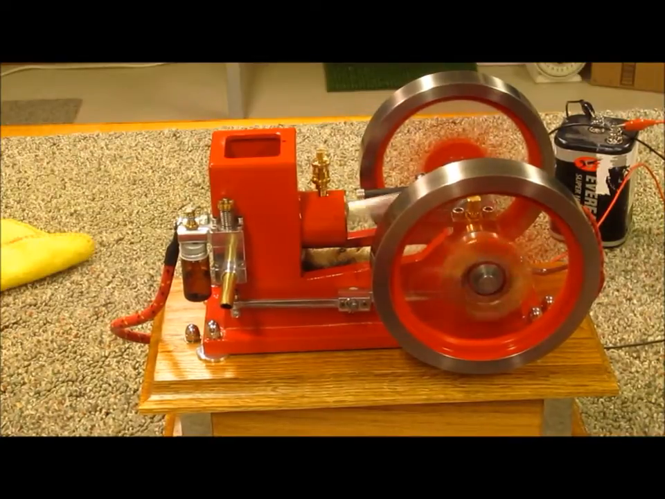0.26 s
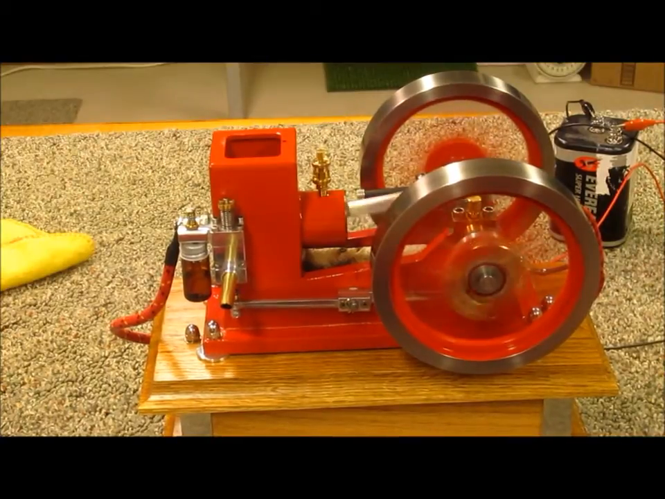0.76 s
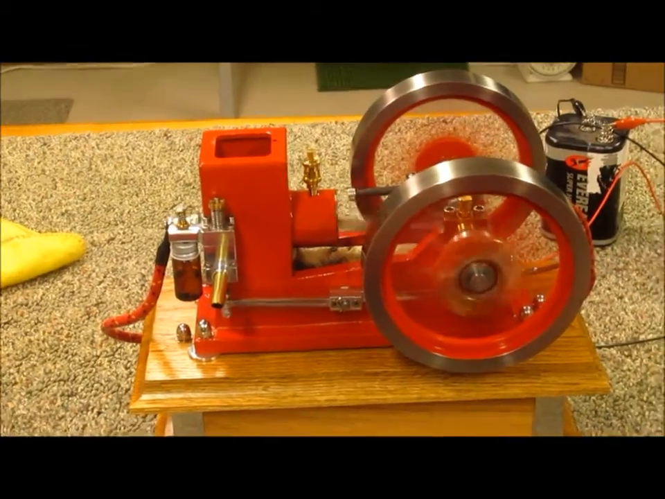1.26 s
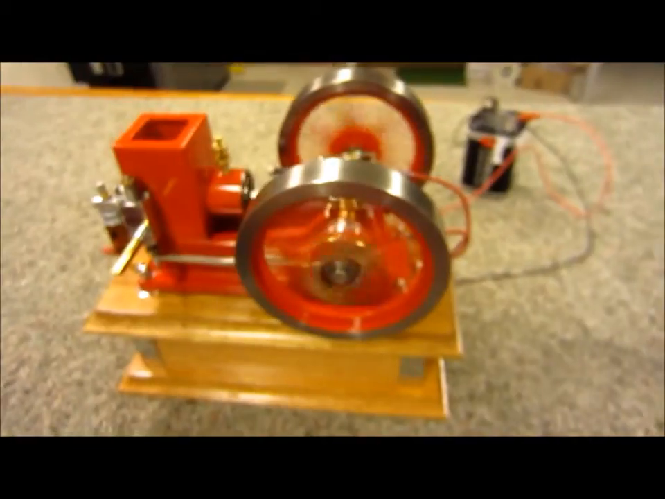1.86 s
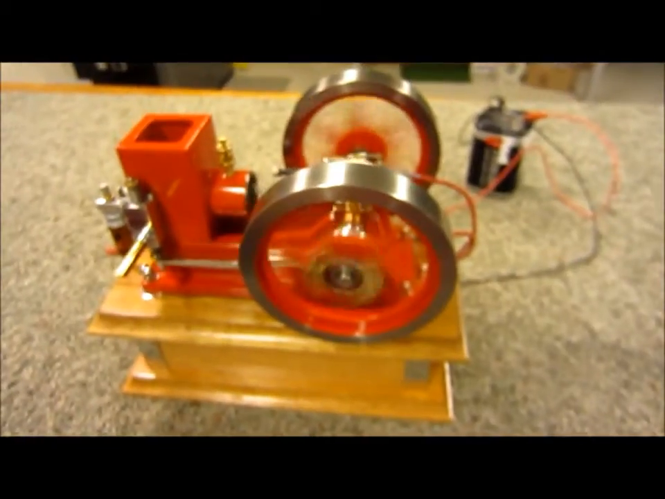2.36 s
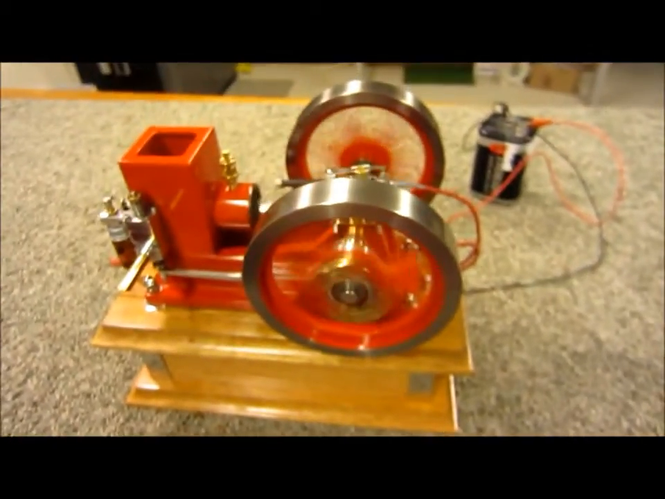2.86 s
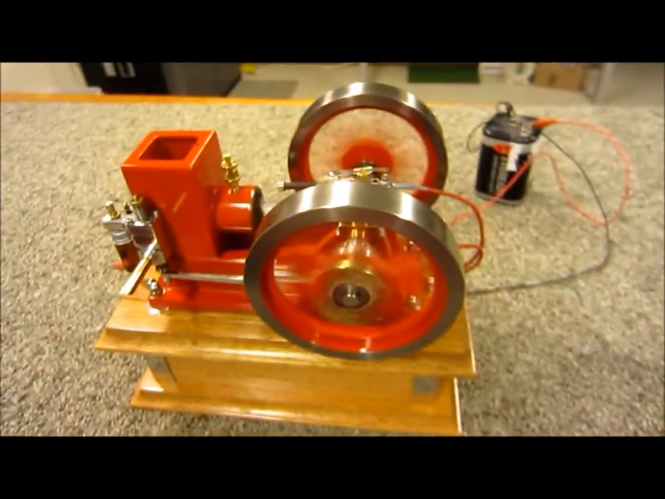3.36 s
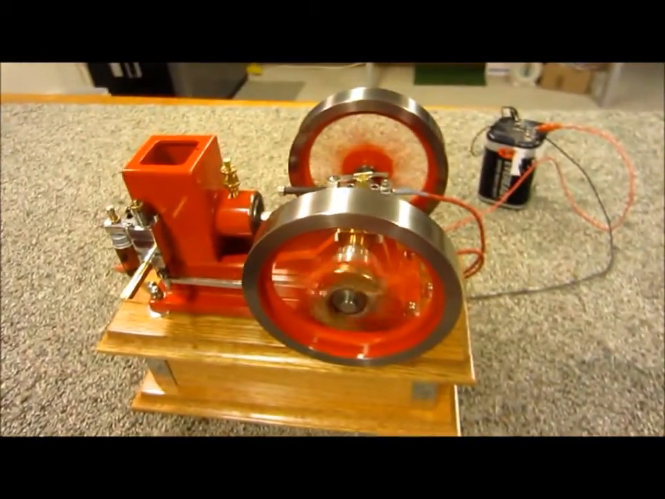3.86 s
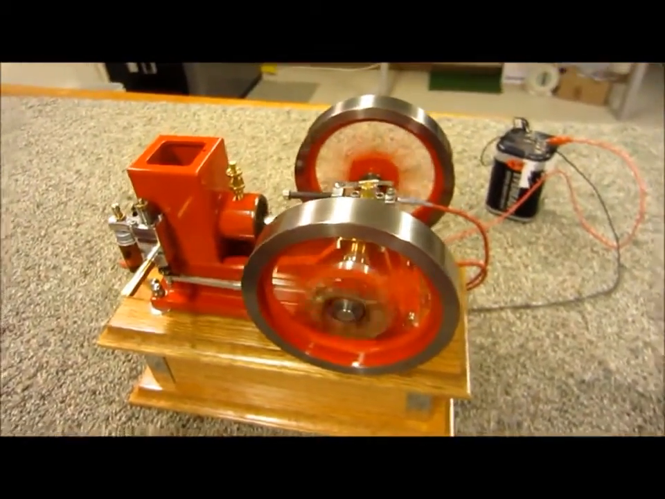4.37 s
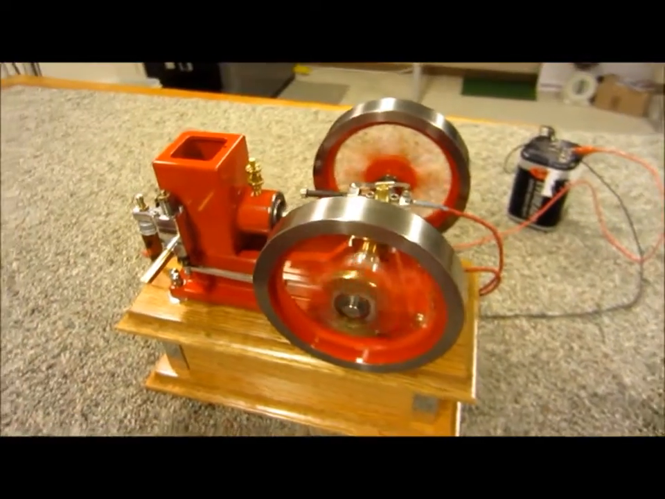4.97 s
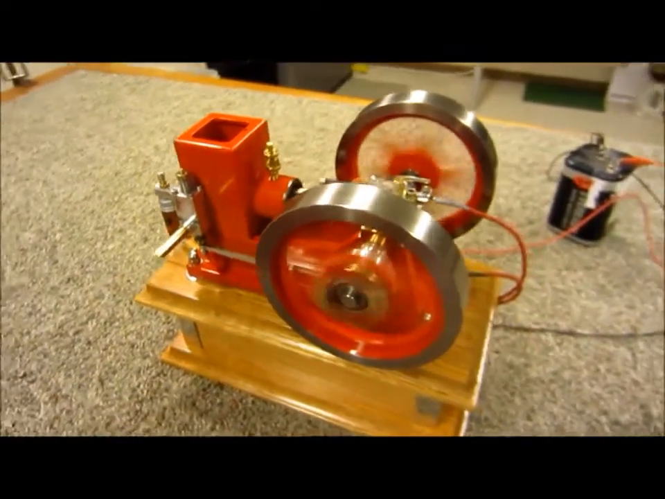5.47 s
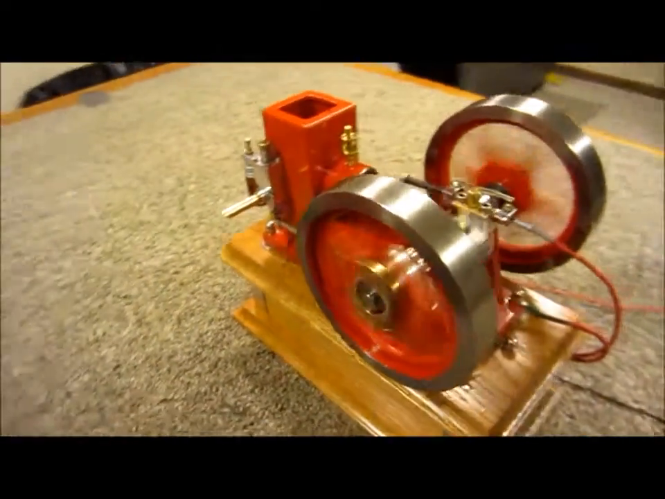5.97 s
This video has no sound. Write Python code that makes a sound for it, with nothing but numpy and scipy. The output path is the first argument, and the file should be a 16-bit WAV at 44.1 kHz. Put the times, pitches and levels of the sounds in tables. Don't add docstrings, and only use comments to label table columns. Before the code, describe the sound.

A small hit-and-miss engine coasts with chuffing metallic clatter in a carpeted hall, firing sharp, irregular, close exhaust pops after a faint fading opening.

```python
import sys
import numpy as np
from scipy import signal
from scipy.fft import rfft, irfft, next_fast_len
from scipy.io import wavfile
from scipy.ndimage import uniform_filter1d

SR = 44100
rng = np.random.default_rng(int(sys.argv[2]) if len(sys.argv) > 2 else 0)


def ratio_of_db(decibels):
    return 10 ** (np.asarray(decibels, float) / 20)


def put_to_file(sound):
    columns = np.atleast_2d(sound).T
    safe = np.clip(columns, -1, 1)
    whole_steps = np.round(safe * 32767)
    wavfile.write(sys.argv[1], SR, whole_steps.astype(np.int16))


N = 274302

# start in seconds, peak in dB, crack in dB re peak, crack pitch in Hz.
FIRINGS = [
    (1.0044, -20, -3.5, 4800),
    (1.77, 1.1, -6.5, 5650),
    (2.5566, 2, -7.5, 6200),
    (3.3665, 1, -5.5, 6270),
    (3.8952, 1.5, -7, 5350),
    (4.2717, 1.5, -7, 6260),
    (5.2759, 1.2, -5.5, 4800),
    (6.0743, 3, -7.5, 6840),
]
# start in seconds (valve snaps open), then lift, snap and flutter peaks in dB.
SUCTIONS = [
    (0.8615, -51, -47.5, -41),
    (1.6292, -24, -12, -14),
    (2.4135, -29, -17, -16),
    (3.0741, -28.5, -18.5, -19),
    (3.2194, -28.5, -17, -18.5),
    (3.7555, -31, -22.5, -19.5),
    (4.1416, -39, -23.5, -23.5),
    (5.1355, -54, -19.5, -20),
    (5.929, -33, -20, -21),
]
# start in seconds, knock peak in dB, drag in dB re running level.
LATCHES = [
    (0.777, -42, -1.5),
    (2.340, -18.5, 2.5),
    (3.003, -19.5, 0),
    (3.684, -21, 0),
    (4.096, -32, -9.5),
    (5.073, -16.5, 0),
    (5.829, -20, -13.5),
    (5.878, -47, -3.5),
]
# from, to in seconds.
GAP_S = (1.45, 1.6105)
SCATTER_DB = 1
LEFT_RIGHT = np.array([[1], [-1]])


def colour(x, table):
    hz, db = np.transpose(table)
    size = next_fast_len(x.shape[-1])
    log_hz = np.log(np.arange(size // 2 + 1) * SR / size + 1)
    gain = ratio_of_db(np.interp(log_hz, np.log(hz), db))
    return irfft(rfft(x, size) * gain, size)[..., :x.shape[-1]]


def unit(x):
    return x / np.sqrt(np.mean(x ** 2))


def band(x, hz, width):
    return signal.lfilter(*signal.iirpeak(hz, hz / width, SR), x)


def add(out, s, sound):
    i = max(int(s * SR), 0)
    out[..., i:i + sound.shape[-1]] += sound[..., :max(N - i, 0)]


def fade(t, t60):
    return ratio_of_db(-60 * t / t60)


def turns():
    edges_s = (-0.012, 1.52, 6.33)
    turn_s, slowing_s = 0.127, 0.003
    sucks = [row[0] for row in SUCTIONS]
    marks = sorted(sucks + [row[0] for row in FIRINGS] + list(edges_s))
    out = []
    for a, b in zip(marks, marks[1:]):
        n = max(round((b - a) / turn_s), 1)
        lengths = (b - a) / n + slowing_s * (np.arange(n) - (n - 1) / 2)
        starts = a + np.cumsum(lengths) - lengths
        kinds = ["intake" if a in sucks else "fire"] + ["coast"] * (n - 1)
        if n > 1 and b in sucks:
            kinds[-1] = "latch"
        out += zip(starts, lengths, kinds)
    return [turn for turn in out if not GAP_S[0] < turn[0] < GAP_S[1]]


def strokes():
    rubs = {"fire": [(0.12, 38, 2, -4, 0.3), (0.62, 33.6, 1, -8, 0.5)],
            "coast": [(0.012, 58, 0.8, -6, 0.48), (0.14, 6.6, -2, -5, 0.38), (0.615, 49, 0.5, -7.5, 0.23)],
            "latch": [(0.015, 48, 4.5, -7.5, 0.69), (0.15, 5, -7.5, 6, 0)],
            "intake": [(-0.145, 36, -1, -8, 0.4), (0.155, 85, 3, -11, 0.2), (0.68, 42, 1, -6, 0.48)]}
    # time in seconds, stroke level in dB.
    running_level = [(0, -55.5), (0.45, -56.5), (0.8, -58.5), (0.95, -62), (1.2, -69), (1.45, -74),
                     (1.6, -34), (1.9, -44), (2.2, -38), (2.7, -42.5), (3.0, -39), (3.5, -40.5),
                     (4.0, -40.5), (4.4, -43.5), (4.8, -38.5), (5.4, -44), (5.65, -39), (6.22, -43.5)]
    rows = [(s + at * length, *rest) for s, length, kind in turns() for at, *rest in rubs[kind]]
    rows += [(s, 86, drag_db, -5.5, 0.35) for s, _, drag_db in LATCHES]
    rows = np.array(rows)
    rows[:, 2] += np.interp(rows[:, 0], *np.transpose(running_level))
    rows[:, 2:4] += SCATTER_DB * rng.standard_normal((len(rows), 2))
    return rows


def gritty(rate, spread_db):
    k = int(SR / rate)
    size_db = spread_db * np.minimum(rng.exponential(size=N // k + 1), 3)
    mid, side = rng.standard_normal((2, N))
    level = uniform_filter1d(np.repeat(ratio_of_db(size_db), k)[:N], k)
    return level * (mid + 0.39 * side * LEFT_RIGHT)


def metal(modes, rate, spread_db, broad_db, edge, kind):
    # frequency in Hz, density in dB per Hz.
    rub_spectrum = [(150, -22.5), (250, -17.5), (590, -18), (900, -9), (1170, -4.5), (1500, -8), (1910, -7),
                    (2600, -9.5), (3050, -17), (5100, -13.5), (6500, -15), (9200, -25), (12100, -32),
                    (14900, -33), (16000, -36)]
    rings = 0
    for hz, width, db in modes:
        ring = band(band(gritty(rate, spread_db), hz, width), hz, 3 * width)
        rings = rings + ratio_of_db(db) * unit(ring)
    split = signal.butter(4, edge, kind, fs=SR, output="sos")
    broad = signal.sosfilt(split, colour(gritty(700, 3.7), rub_spectrum))
    return unit(unit(rings) + ratio_of_db(broad_db) * unit(broad))


def slack():
    out, t = np.zeros(N), np.arange(int(0.012 * SR)) / SR
    clicks_per_s = 70
    for at, size, pitch in rng.random((int(clicks_per_s * N / SR), 3)):
        hz = 900 * 10 ** pitch
        hit = rng.standard_normal(len(t)) * fade(t, 0.01)
        click = band(band(hit, hz, 0.35 * hz), hz, 0.55 * hz)
        add(out, at * N / SR, ratio_of_db(-12 * size - 17 * pitch) * unit(click))
    return unit(out)


def clatter():
    # time in seconds, level in dB.
    whirr_level = [(0, -57), (.9, -63.5), (1.202, -71), (1.451, -77), (1.6, -36), (2.0, -48), (3.202, -47),
                   (4.598, -44.5), (6.22, -44.5)]
    # frequency in Hz, width in Hz, level in dB.
    frame_modes = [(440, 140, -9), (592, 120, 0), (978, 45, -5.5), (1169, 104, 2), (1610, 110, -31),
                   (1885, 59, 1), (2317, 344, 1.5)]
    # frequency in Hz, width in Hz, level in dB.
    linkage_modes = [(3670, 190, 6), (4180, 170, 6), (6213, 86, 6.5), (6494, 100, 6.5), (7670, 190, -0.5),
                     (8900, 500, -5)]
    # frequency in Hz, density in dB per Hz.
    box_spectrum = [(15, -48), (25, -46), (81, -28.5), (134, 5.5), (221, -17), (249, 0.5), (365, -21),
                    (400, 6.5), (520, -9), (880, -120)]
    low, high = np.zeros((2, N))
    for s, ms, db, treble_db, place in strokes():
        u = np.arange(int(ms * SR / 1000 * 2.4)) / (ms * SR / 1000)
        swell = 0.5 + np.exp(-((u - place) / 0.52) ** 2)
        shape = swell * ratio_of_db(-9 * u ** 2) * np.minimum(u / 0.004, 1)
        shape /= np.sqrt(np.mean(shape[u < 1] ** 2))
        bearing_click = 0.8 * fade(u * ms, 22.0)
        add(low, s, ratio_of_db(db) * shape)
        add(high, s, ratio_of_db(db + treble_db) * shape * (ratio_of_db(-3 * u) + bearing_click))
    whirr = ratio_of_db(np.interp(np.arange(N) / SR, *np.transpose(whirr_level)))
    frame = metal(frame_modes, 130, 3.14, -0.71, 2420, "low")
    linkage = metal(linkage_modes, 160, 3.5, 2.5, 2900, "high")
    box = unit(colour(rng.standard_normal(N), box_spectrum))
    out = ratio_of_db(2.5) * np.hypot(low, ratio_of_db(-1.0) * whirr) * frame
    out = out + ratio_of_db(-0.5) * np.hypot(high, ratio_of_db(-8.5) * whirr) * linkage
    out = out + ratio_of_db(-12.5) * whirr * box
    return out + ratio_of_db(-8.5) * np.hypot(low, whirr) * slack()


def chirps():
    # time in seconds, chirp level in dB, chirp pitch in Hz.
    tappet = [(0.1, -44, 4070), (0.75, -53, 4020), (1.301, -62.5, 4000), (1.45, -61, 3900),
              (1.6, -33, 3900), (2.002, -41.5, 3880), (2.3, -37.5, 3940), (2.7, -39, 3800),
              (3.0, -55, 3850), (3.599, -27.5, 4007), (3.999, -32.5, 3900), (4.4, -35, 3850),
              (5.0, -36, 3900), (5.499, -52, 3890), (5.7, -33, 4000), (6.2, -55, 4270)]
    starts, suction = [], []
    for s, length, kind in turns():
        if kind != "fire":
            starts.append(s + (0.67 * length if kind == "intake" else 0.004))
            suction.append(kind == "intake")
    starts = np.array(starts + [row[0] + 0.0017 for row in LATCHES])
    quieter = np.array(suction + [True] * len(LATCHES))
    at, db, hz = np.transpose(tappet)
    chance = rng.standard_normal((len(starts), 2))
    levels = np.interp(starts, at, db) - 8.5 * quieter + SCATTER_DB * chance[:, 0]
    return zip(starts, levels, np.interp(starts, at, hz) + 120 * chance[:, 1])


def ticks():
    # start in seconds, peak in dB, pitch in Hz, treble in dB re peak.
    knocks = [(1.387, -50, 446, -2), (1.6128, -26, 1200, -10), (1.651, -22, 353, -3), (2.367, -42, 1200, 2),
              (5.396, -42, 1200, 3), (1.726, -23.5, 1194, -1), (2.282, -48, 1350, -17),
              (2.298, -25, 607, -25), (2.437, -16, 561, -10), (2.685, -44, 1240, -22),
              (2.941, -33.5, 1170, -28), (3.241, -19.5, 538, -26.5), (3.291, -25.5, 409, 1),
              (3.624, -19.5, 580, -34), (3.643, -30, 600, -29), (3.779, -22, 526, -17),
              (4.019, -26.5, 592, -21), (4.576, -35, 1150, -23), (5.158, -22, 545, -13),
              (5.657, -30, 1260, -27), (5.795, -42, 1130, -21), (6.027, -38, 1140, 9)]
    out, t = np.zeros(N), np.arange(int(0.068 * SR)) / SR
    for s, db, hz in chirps():
        ring = unit(band(rng.standard_normal(len(t)), hz, 300.0))
        ring = band(ring * fade(t, 0.051), hz, 900.0)
        ring = 0.5 * ring / np.abs(ring).max()
        add(out, s, ratio_of_db(db + 11.0) * ring)
        add(out, s + 0.019, ratio_of_db(db - 2.5) * ring)
    latch_knocks = [(s, db, 616, -26) for s, db, _ in LATCHES]
    for s, db, hz, treble_db in [*knocks, *latch_knocks]:
        hit = rng.standard_normal(len(t))
        body = unit(band(band(hit, 1440.0, 1600.0), 1440.0, 1600.0))
        rattle = unit(band(hit, hz, 140.0)) + 0.79 * body
        treble = unit(band(band(hit, 4700.0, 5000.0), 5200.0, 5000.0))
        knock = rattle * fade(t, 0.055) + ratio_of_db(treble_db) * treble * fade(t, 0.02)
        add(out, s, ratio_of_db(db - 6.5) * knock)
    return out


def valve():
    # place in turns, pitch in Hz, sharpness (1 = sharp start).
    valve_steps = [
        (-0.098, 164, 0),
        (0, 238, 1.0),
        (0.248, 265, 0.05),
        (0.353, 212, 0),
    ]
    # start in seconds, peak in dB, pitch in Hz, sharpness (1 = sharp start).
    puffs = [(1.39, -53, 260, 0.0), (1.42, -55.5, 200.0, 0.043), (1.6527, -22, 400, 0.0),
             (1.691, -25, 315.0, 0.0), (1.7162, -25.5, 214.0, 0.13), (1.7369, -29, 244.0, 0.84),
             (3.2843, -27, 257.0, 0.0), (3.346, -27, 160.0, 0.0), (4.0545, -21.5, 208.0, 0.11),
             (5.116, -23, 198, 0.0), (5.836, -19.5, 198, 0.06)]
    lengths = [length for _, length, kind in turns() if kind == "intake"]
    steps = []
    for (s, *levels), length in zip(SUCTIONS, lengths):
        levels = levels + [levels[-1] + 2.9]
        for (at, hz, snap), db in zip(valve_steps, levels):
            steps.append((s + at * length, db, hz, snap))
    thuds = [(s + 0.0025, db - 17, 153, 0.5) for s, db, _ in LATCHES]
    return [*puffs, *steps, *thuds]


def gulps():
    out, t = np.zeros(N), np.arange(-0.012 * SR, 0.014 * SR) / SR
    for s, db, hz, snap in valve():
        cycles = np.where(t < 0, 0.55 - 0.45 * snap, 0.8)
        shape = np.exp(-(t * hz / cycles) ** 2)
        suck = -np.cos(2 * np.pi * hz * (0.95 - 0.12 * snap) * t) * shape
        breath = unit(band(rng.standard_normal(len(t)), 590.0, 550.0)) * np.exp(-(t / 0.011) ** 2)
        add(out, s + t[0], ratio_of_db(db) * (ratio_of_db(-21.0) * breath + suck))
    return out


def pops():
    # frequency in Hz, level in dB, t60 in seconds.
    pipe_modes = [(216, -6.8, .041), (247, -12.6, .085), (162, -35, .4), (366, -30, .2), (458, -8.3, .035),
                  (581, -6.5, .031), (690, -15, .025)]
    # frequency in Hz, density in dB per Hz.
    jet_spectrum = [(530, -55), (900, -11), (1500, -11), (2700, -9.5), (4520, -17), (6250, -9.5),
                    (9310, -22.5), (10400, -18), (11700, -24), (16000, -25)]
    out, t = np.zeros(N), np.arange(SR // 2) / SR
    ring = 0
    for hz, db, t60 in pipe_modes:
        phase = 2 * np.pi * hz * t - np.pi / 2 * (hz > 300)
        ring = ring + ratio_of_db(db) * fade(t, t60) * np.cos(phase)
    ring = -np.convolve(ring, np.hanning(int(0.00145 * SR)))[:len(t)]
    tip = np.maximum(t - 0.00055, 0)
    tip_ring = ratio_of_db(-11) * fade(tip, 0.016) * np.sin(2 * np.pi * 1280 * tip)
    ring = ring / np.abs(ring).max() - tip_ring
    late = np.maximum(t - 0.0013, 0)
    burst = (late > 0) * (fade(late, 0.01) + ratio_of_db(-15.5) * fade(late, 0.024))
    for s, db, crack_db, hz in FIRINGS:
        jet = unit(colour(rng.standard_normal(len(t)), jet_spectrum))
        jet = unit(jet + ratio_of_db(-21.0) * unit(band(jet, hz, 740.0)))
        add(out, s - 0.0006, ratio_of_db(db + 1.5) * (ring + ratio_of_db(crack_db - 0.5) * jet * burst))
        leak = t[:int(0.005 * SR)]
        add(out, s - 0.005, ratio_of_db(db - 44.5) * jet[:len(leak)] * leak / 0.0012)
    return out


def walls(x):
    # echo delay in ms, level in dB.
    echoes = [(5.9, -10.5), (11.5, -24.5), (20.5, -32), (26.5, -25.5), (38.8, -32), (44.6, -34),
              (48.6, -29)]
    out = np.zeros(N)
    for ms, db in echoes:
        add(out, ms / 1000, ratio_of_db(db) * x)
    return signal.lfilter([0.25], [1, -0.75], out)


def hall(x):
    # frequency in Hz, t60 in seconds, level in dB.
    hall_bands = [(97, 0.58, -17.5), (200, 0.34, -19), (353, 0.34, -14.5), (600, 0.15, -16),
                  (880, 0.14, -19), (1530, 0.14, -46), (3330, 0.23, -16.5), (6800, 0.27, -25),
                  (10700, 0.25, -21)]
    t, tail = np.arange(int(0.45 * SR)) / SR, 0
    for hz, t60, db in hall_bands:
        mid, side = (band(band(rng.standard_normal(len(t)), hz, hz * 0.81), hz, hz * 0.81) for _ in range(2))
        pair = mid + min(hz / 4000, 0.6) * side * LEFT_RIGHT
        decay = fade(t, t60) * np.clip((t - 0.006) / 0.0036, 0, 1)
        level = ratio_of_db(db) * np.sqrt(1.48 * hz / SR / np.sum((mid * decay) ** 2))
        tail = tail + level * pair * decay
    return signal.fftconvolve(x[None], tail, axes=1)[:, :N]


def ports(pair, left):
    # frequency in Hz, lead in radians.
    left_lead = [(60, -.15), (250, -0.21), (950, -0.54), (2200, -1.16), (2900, 1.2), (4300, 0.32),
                 (9000, 0.96), (13000, 0.98)]
    hz, rad = np.transpose(left_lead)
    size = next_fast_len(N)
    log_hz = np.log(np.arange(size // 2 + 1) * SR / size + 1)
    lead = np.interp(log_hz, np.log(hz), rad)
    shifted = irfft(rfft(colour(pair[0], left), size) * np.exp(1j * lead), size)[:N]
    return np.array([shifted, pair[1]])


def scene():
    # frequency in Hz, level in dB.
    left_of_pipe = [(60, -1.0), (110, 0.5), (200, -0.5), (380, -1.0), (700, -2.5), (1290, -6.5),
                    (2380, -11.5), (4400, -6.0), (8120, -5.5), (15000, -9.0)]
    # frequency in Hz, level in dB.
    left_of_crank = [(60, 0.0), (110, -0.5), (200, 0.0), (380, -2.0), (700, -4.0), (1290, -8.0),
                     (2380, -13.5), (4400, -12.5), (8120, -9.5), (15000, -4.5)]
    # frequency in Hz, level in dB.
    housing = [(9000, -1.5), (11300, -8), (12150, -16), (12900, -6.5), (15000, -5)]
    # frequency in Hz, level in dB.
    first_view = [(250, 1.5), (440, 2), (700, -3.5), (2000, 0), (3100, -8.5), (4100, 2.5), (5200, -2.5),
                  (9000, -3), (14000, 2)]
    t = np.arange(N) / SR
    first = t < GAP_S[0]
    running, crank = clatter(), ticks()
    running = np.where(first, colour(running, first_view), running)
    pipe = pops() + gulps()
    pipe = np.where(first, ratio_of_db(-1.0) * colour(pipe, first_view), pipe)
    blows = pipe + crank
    exhaust_end = ports(pipe + walls(blows) + hall(blows), left_of_pipe)
    crank_end = ports(crank + running, left_of_crank)
    return colour(exhaust_end + crank_end, housing) * (first | (t > GAP_S[1]))


def roll_off(x):
    return signal.sosfilt(signal.butter(12, 16430, fs=SR, output="sos"), x)


def record(dry):
    loud = np.clip(ratio_of_db(-0.5) * dry, -0.98, 0.98)
    top = signal.ellip(8, 0.2, 60, 16050, fs=SR, output="sos")
    loud = signal.sosfilt(top, loud)
    hz, _, cells = signal.stft(loud, SR, nperseg=1024)
    patch = uniform_filter1d(np.abs(cells), size=7, axis=1)
    chance = np.repeat(rng.standard_normal((65, cells.shape[2])), 8, axis=0)[:len(hz)]
    usual = np.sqrt(np.mean(patch ** 2, axis=1, keepdims=True))
    faint = (patch < ratio_of_db(3.0 * chance) * ratio_of_db(-36) * usual) & (hz[:, None] > 10500)
    loud = signal.istft(cells * ~faint, SR, nperseg=1024)[1][:, :N]
    return roll_off(loud)


dry = scene()
out = record(dry)
put_to_file(out)
```